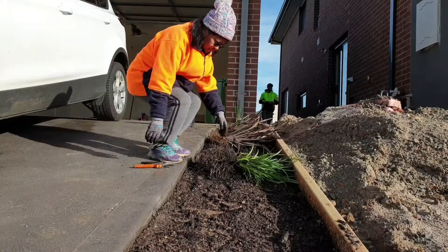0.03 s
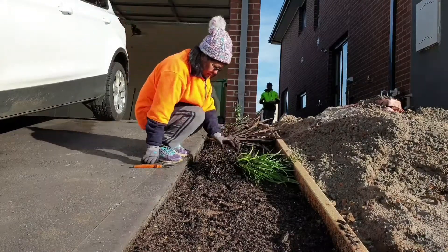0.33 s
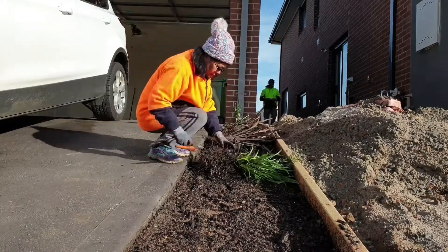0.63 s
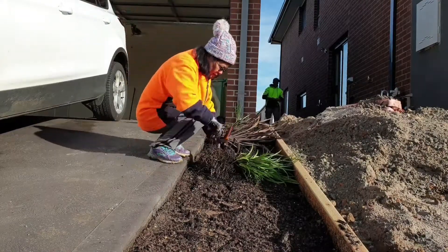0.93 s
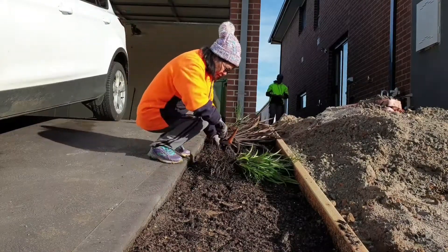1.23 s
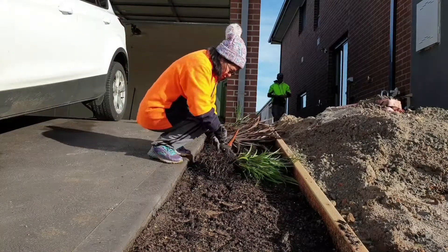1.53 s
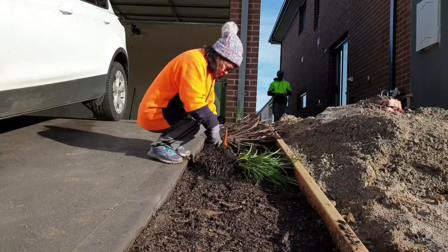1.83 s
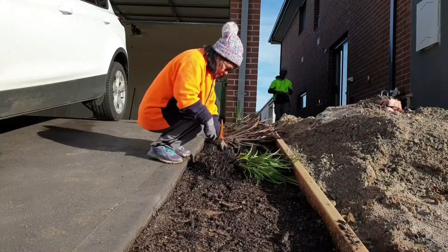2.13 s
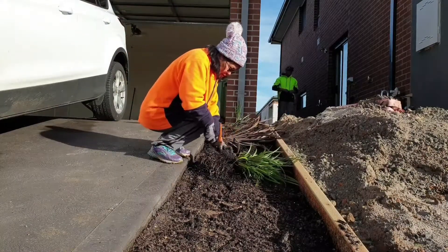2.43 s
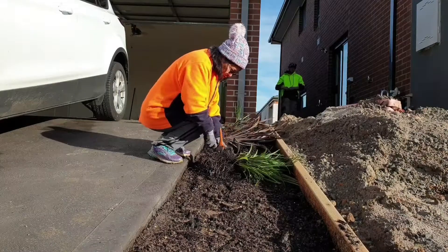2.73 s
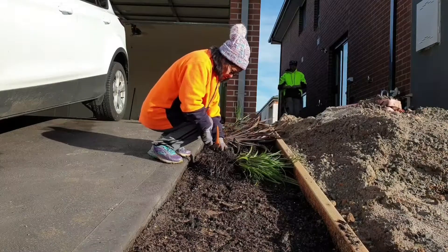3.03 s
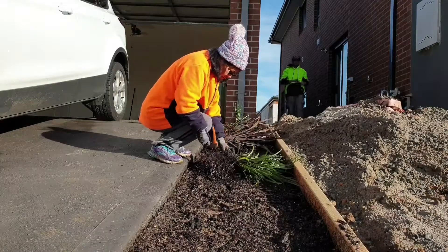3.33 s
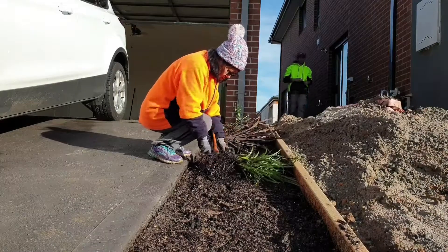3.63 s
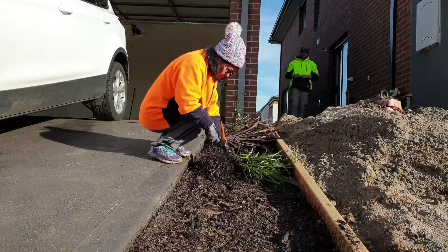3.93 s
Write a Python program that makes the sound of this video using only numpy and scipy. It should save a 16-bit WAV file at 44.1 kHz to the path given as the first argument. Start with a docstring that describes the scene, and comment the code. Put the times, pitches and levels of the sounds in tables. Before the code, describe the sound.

Crunchy digging in soil and mulch with a hand tool, after a brief scrape on concrete.

```python
"""Hand tool in a garden bed

Close by, a gardener drags a hand tool off a concrete driveway and works it four times into soil and
bark mulch. Each stroke is a crunch of tiny grains with twigs snapping in it; leaves and sleeves rustle
in between. The slab and house walls answer briefly at the stereo microphone, over a low rumble of wind
and a distant hum."""
import sys
import numpy as np
from scipy import signal
from scipy.fft import rfft, irfft
from scipy.io import wavfile

SR = 44100
rng = np.random.default_rng(int(sys.argv[2]) if len(sys.argv) > 2 else 0)


def store_pcm(level_fs):
    """Save levels as 16-bit WAV."""
    pcm = np.round(np.clip(level_fs, -1, 1) * 32767).astype(np.int16)
    wavfile.write(sys.argv[1], SR, np.atleast_2d(pcm).T)


N = 176400
T = np.arange(N) / SR
HZ = np.maximum(np.fft.rfftfreq(N, 1 / SR), 1)


def from_db(db):
    """Decibels to gain."""
    return 10 ** (np.asarray(db) / 20)


def rms_one(x):
    """Scale to unit power."""
    return x / np.sqrt(np.mean(x ** 2) + 1e-20)


def at_hz(points):
    """Read a table on a log-frequency axis."""
    hz, value = np.transpose(points)
    return np.interp(np.log(HZ), np.log(hz), value)


def colour(x, spectrum, tilt_db=0):
    """Give a texture its spectrum, tilted per octave and falling below the first point; unit power."""
    low_hz = spectrum[0][0]
    gain = from_db(at_hz(spectrum) + tilt_db * np.log2(np.maximum(HZ, low_hz)))
    bass_cut = np.minimum(HZ / low_hz, 1) ** 2
    return rms_one(irfft(rfft(x) * gain * bass_cut, N))


def stereo(pair, likeness):
    """Two unrelated signals become left and right, with likeness as their correlation."""
    mid = np.sqrt(1 + likeness) * pair[0]
    side = np.sqrt(1 - likeness) * pair[1]
    return np.array([mid + side, mid - side]) / np.sqrt(2)


def noise(likeness, size=N):
    """White stereo noise with a given left-right correlation."""
    return stereo(rng.standard_normal((2, size)), likeness)


def drift(hz):
    """Random wander of unit power, mostly slower than hz."""
    return rms_one(irfft(rfft(rng.standard_normal(N)) / (1 + (HZ / hz) ** 2), N))


def swell(time, rise, hold, fall, db):
    """Reach db at the given time, hold and fall; rise and fall are the seconds taken for 20 dB."""
    before = np.maximum(time - T, 0) / rise
    after = np.maximum(T - time - hold, 0) / fall
    return from_db(db - 20 * (before + after))


def resonate(x, hz, t60):
    """A resonance with gain 1 at its top, dying by 60 dB in t60 seconds."""
    r = from_db(-60 / (t60 * SR))
    feedback = [1, -2 * r * np.cos(2 * np.pi * hz / SR), r * r]
    return signal.lfilter(np.array([1, 0, -1]) * (1 - r * r) / 2, feedback, x + 1e-18)


def band_around(hz, octaves):
    """A gentle band-pass reaching so many octaves to each side, capped in the high treble."""
    edges = [hz / 2 ** octaves, min(hz * 2 ** octaves, SR / np.e)]
    return signal.butter(1, edges, "band", fs=SR, output="sos")


def grains(per_s, spread_db, likeness):
    """Random tiny contacts, many small and a few large."""
    sizes = from_db(spread_db * np.minimum(rng.exponential(1, (2, N)), 5))
    signs = rng.choice([-1, 1], (2, N))
    struck = rng.random((2, N)) < per_s / SR
    return stereo(sizes * signs * struck, likeness)


def outdoors():
    """Low wind with a rumble that swells twice, and a faint far hiss."""
    # wind, rumble and far hiss spectra: (frequency [Hz], level [dB])
    wind_spectrum = [(20, -24), (30, -14), (38, -10.5), (47, 2), (60, -4), (85, -7), (130, -10.5),
                     (170, -10.5), (230, -18), (300, -20.5), (430, -23), (520, -29), (700, -34),
                     (1200, -44.5), (2500, -60.5)]
    rumble_spectrum = [(90, -4.5), (150, -3), (250, -6), (400, -33), (1000, -63), (3000, -70)]
    hiss_spectrum = [(700, 4), (1100, -7.5), (2000, -8), (4000, -10), (5500, -16.5), (7200, -12),
                     (9000, -28), (11000, -8), (14500, -9)]
    # wind across the microphone pair: (frequency [Hz], left-right correlation [0-1])
    wind_likeness = [(30, 0.9), (120, 0.9), (250, 0.85), (500, 0.3), (1000, 0.015)]
    # rumble swells: (peak time [s], rise [s], hold [s], fall [s], level [dB])
    swells = [(0.45, 0.068, 0.032, 0.072, -58.5), (2.29, 0.34, 0.23, 0.4, -56)]
    airflow = irfft(stereo(rfft(rng.standard_normal((2, N))), at_hz(wind_likeness)), N)
    wind = colour(airflow, wind_spectrum) * from_db(-50 + drift(hz=4.1))
    rumble = colour(noise(likeness=0.94), rumble_spectrum) * sum(swell(*row) for row in swells)
    hiss = colour(noise(likeness=0.062), hiss_spectrum) * from_db(-75)
    return wind + rumble + hiss


def distant_hum(low_hz=360.5, high_hz=442.3, waver_hz=2.96):
    """Two wavering tones from far away; the lower is husky and swells near the end."""
    # course of the lower tone: (time [s], level [dB])
    levels = [(0, -73), (0.9, -72), (1.3, -67), (1.9, -74), (2.7, -80), (3.05, -70.5), (3.19, -60),
              (3.35, -58), (3.58, -65), (3.7, -75), (3.82, -65), (4, -62)]
    pitches = [hz + waver_hz * drift(hz=17.5) for hz in (low_hz, high_hz)]
    low, high = [np.sqrt(2) * np.sin(2 * np.pi * np.cumsum(hz) / SR) for hz in pitches]
    low_db = np.interp(T, *np.transpose(levels)) + 0.5 * drift(hz=43)
    husk = from_db(-7) * rms_one(resonate(noise(likeness=0.55), low_hz, t60=0.055))
    high_db = -78.5 + 2 * drift(hz=3.9)
    return (low + husk) * from_db(low_db) + high * from_db(high_db)


def rustling():
    """Leaves and sleeves brush softly between strokes."""
    # rustles: (peak time [s], rise [s], hold [s], fall [s], level [dB], tilt [dB/octave])
    rustles = [(0.0, 0.05, 0.014, 0.14, -73, -8), (0.172, 0.12, 0.032, 0.19, -74.5, -2),
               (0.67, 0.067, 0.11, 0.087, -79.5, -3), (0.976, 0.044, 0.011, 0.081, -71, -6.5),
               (1.074, 0.075, 0.014, 0.065, -72.5, -0.5), (1.673, 0.57, 0.16, 0.1, -68, -2),
               (1.994, 0.15, 0.014, 0.11, -71, -3), (2.418, 0.26, 0.065, 0.087, -71, -1),
               (2.813, 0.15, 0.033, 0.085, -67, 1.5), (2.917, 0.08, 0.07, 0.21, -72, 0.5),
               (3.334, 0.072, 0.023, 0.13, -65.5, 4.5), (3.69, 0.26, 0.081, 0.12, -69.5, -1)]
    # brushing leaves: (frequency [Hz], level [dB])
    leaves = [(600, -37), (1500, -12.5), (2000, -11.5), (2450, -8.5), (2800, -10.5), (3200, -10),
              (4000, -13), (5700, -9.5), (6600, -2), (8200, -5), (9300, -13), (11000, -16.5),
              (14000, -15.5)]
    fibres = grains(per_s=8300, spread_db=3, likeness=0.17)
    return sum(colour(fibres, leaves, tilt) * swell(*shape) for *shape, tilt in rustles)


def tool_on_concrete():
    """Grit rasps under the tool and rings its blade; as it lifts it knocks and its handle clacks."""
    # the slide and the blade's singing: (peak time [s], rise [s], hold [s], fall [s], level [dB])
    slide = [(0.365, 0.08, 0.054, 0.16, -51.5)]
    singing = [(0.286, 0.028, 0.042, 0.05, -65), (0.334, 0.063, 0.073, 0.073, -56)]
    # rasp on concrete: (frequency [Hz], level [dB])
    rasp_spectrum = [(250, -10), (400, -3), (490, 4.5), (700, -7.5), (1200, -9), (2000, -11.5),
                     (4000, -9.5), (7000, -11), (9000, -16.5), (14000, -20)]
    # blade and handle modes: (frequency [Hz], relative level [dB], t60 [s])
    blade_modes = [(476, 1, 0.1), (592, -4.5, 0.11), (1233, -6, 0.076), (3130, -15, 0.053),
                   (4470, -23, 0.03), (5020, 2, 0.018), (5420, -1, 0.027), (6240, -9, 0.018),
                   (6500, -12, 0.022), (6970, -18, 0.04)]
    handle_modes = [(854, 2, 0.0061), (1110, -3, 0.0093), (1626, -13, 0.013), (2310, -18, 0.014),
                    (3260, -4, 0.031), (3740, -16, 0.035), (6940, -3, 0.018)]
    # knocks on the slab: (time [s], level [dB], centre [Hz], length [s])
    hits = [(0.3425, -48, 5000, 0.004), (0.3700, -42.5, 4340, 0.0036), (0.4292, -56, 8050, 0.0014),
            (0.4555, -43, 4430, 0.0072), (0.5015, -47.5, 3230, 0.015)]
    grit = grains(per_s=4900, spread_db=1.5, likeness=0.085)
    rasp = colour(grit, rasp_spectrum) * swell(*slide[0])
    ringing = sum(from_db(db) * rms_one(resonate(grit, hz, t60)) for hz, db, t60 in blade_modes)
    blade = rms_one(ringing) * sum(swell(*row) for row in singing)
    knocks = contacts(hits, octaves=1.86, ring_db=-7)
    handle = sum(from_db(10.5 + db) * resonate(knocks, hz, t60) for hz, db, t60 in handle_modes)
    return rasp + blade + knocks + handle


def contacts(rows, octaves, ring_db):
    """Each contact builds up, cracks (20 dB down over its length), spatters and rings at its centre."""
    build_up_s, splinter_s, ring_cycles = 0.008, 0.018, 7.3
    size, lead = 3072, 512  # samples in a burst, and ahead of its crack
    t = (np.arange(size) - lead) / SR
    spatter = from_db(np.where(t < 0, -14 + 20 * t / build_up_s, -16.5 - 20 * t / splinter_s))
    out = np.zeros((2, N + SR))
    for time, db, hz, length in rows:
        crack = noise(likeness=0.2, size=size) * from_db(-20 * abs(t) / length) * (t >= 0)
        splinters = rms_one(rng.standard_normal((2, size)) ** 3) * spatter
        bass_cut = signal.butter(2, hz / 2 ** octaves, "high", fs=SR, output="sos")
        burst = signal.sosfilt(np.vstack([bass_cut, band_around(hz, octaves)]), crack + splinters)
        ring = from_db(ring_db) * resonate(burst, hz, t60=ring_cycles / hz)
        decay_rms = np.sqrt(length * SR / size / np.log(100))  # longer cracks carry more energy
        start = int(time * SR) - lead
        out[:, start:start + size] += from_db(db) * decay_rms * rms_one(burst + ring)
    return out[:, :N]


def digging():
    """Crumbs of soil crunch under each stroke while twigs and bark snap."""
    # pushes through soil: (peak time [s], rise [s], hold [s], fall [s], level [dB], tilt [dB/octave])
    digs = [(1.366, 0.092, 0.016, 0.18, -68.5, 0.5), (1.538, 0.068, 0.018, 0.11, -56, 0.5),
            (1.641, 0.051, 0.01, 0.11, -66, -3.5), (1.737, 0.023, 0.045, 0.17, -61, -6),
            (1.802, 0.037, 0.022, 0.093, -61, 4), (2.541, 0.02, 0.0034, 0.016, -48.5, 8.5),
            (2.534, 0.022, 0.08, 0.088, -57, 1.5), (3.109, 0.11, 0.016, 0.075, -54.5, 0),
            (3.147, 0.033, 0.021, 0.074, -53.5, -1.5), (3.519, 0.071, 0.032, 0.087, -54, -0.5),
            (3.745, 0.042, 0.0054, 0.041, -70, 5)]
    # crunching soil: (frequency [Hz], level [dB])
    soil = [(250, 1), (500, 3), (850, -0.5), (1250, -6), (1700, -6), (2100, -12), (2550, -4.5),
            (4200, -4.5), (6500, -1), (9000, -5), (14000, -5)]
    # breaking twigs and bark: (time [s], level [dB], centre [Hz], length [s])
    snaps = [(1.3585, -55, 7000, 0.0037), (1.379, -57, 7500, 0.0067), (1.478, -57.5, 7600, 0.004),
             (1.504, -47, 7260, 0.0049), (1.5225, -44, 8400, 0.002), (1.5495, -40.5, 5800, 0.0029),
             (1.5645, -37.5, 4170, 0.0013), (1.568, -48, 2700, 0.006), (1.580, -52, 2200, 0.005),
             (1.6035, -43.5, 2430, 0.003), (1.607, -53, 1920, 0.011), (1.613, -45, 5100, 0.0038),
             (1.7905, -49, 7450, 0.0016), (1.875, -58, 7000, 0.0015), (2.446, -52.5, 7000, 0.0066),
             (2.469, -55, 7400, 0.0055), (2.4985, -51, 7300, 0.0053), (2.5175, -42.5, 7540, 0.0033),
             (2.534, -43, 9000, 0.0015), (2.5395, -39, 6300, 0.0027), (2.545, -40.5, 8500, 0.0075),
             (2.560, -37.5, 6150, 0.0016), (2.576, -51.5, 3270, 0.0091), (2.594, -52, 4000, 0.013),
             (2.611, -40.5, 5900, 0.0016), (3.051, -49, 6970, 0.0032), (3.0555, -52, 7100, 0.0077),
             (3.0675, -40.5, 7500, 0.0035), (3.085, -40, 5700, 0.0021), (3.088, -48, 6500, 0.0018),
             (3.0975, -39, 6300, 0.0062), (3.1024, -32.5, 5440, 0.0035), (3.131, -45.5, 4470, 0.0065),
             (3.146, -47, 5600, 0.024), (3.157, -38.5, 6500, 0.0041), (3.1635, -46, 5400, 0.0056),
             (3.172, -38, 4630, 0.0011), (3.197, -47, 6500, 0.0043), (3.476, -57, 7500, 0.012),
             (3.4865, -46, 6600, 0.005), (3.510, -49.5, 7900, 0.017), (3.538, -41.5, 5400, 0.0043),
             (3.548, -52, 4750, 0.009), (3.747, -55, 8100, 0.008), (3.755, -55, 7700, 0.0087)]
    crumbs = crumble()
    crunch = sum(colour(crumbs, soil, tilt) * swell(*shape) for *shape, tilt in digs)
    return crunch + contacts(snaps, octaves=0.78, ring_db=7.5)


def crumble(grains_per_s=5000):
    """Soil gives way in broad cracks and in crumbs that each tick at a pitch of their own."""
    ticks = grains(grains_per_s, spread_db=3, likeness=0.49)
    pitches_hz = np.geomspace(1100, 11800, 18)
    pitch_index = rng.integers(0, len(pitches_hz), N)
    crumbs = sum(signal.sosfilt(band_around(hz, octaves=0.31), ticks * (pitch_index == k) + 1e-18)
                 for k, hz in enumerate(pitches_hz))
    cracks = grains(grains_per_s, spread_db=2, likeness=0.098)
    return rms_one(cracks) + from_db(-1.5) * rms_one(crumbs)


def driveway_bounce(x, delays_s=(0.001238, 0.001557)):
    """One close reflection off the slab reaches the left microphone port, then the right."""
    delayed = [np.pad(side, (int(lag * SR), 0))[:N] for side, lag in zip(x, delays_s)]
    return from_db(-21) * np.array(delayed)


def walls(x, t60=0.14, delay_s=0.0043, cutoff_hz=15600):
    """A short, slightly dull scatter from the house, the car and the ground nearby."""
    t = T[:SR // 2]
    scatter = rng.standard_normal((2, len(t))) * from_db(-60 * t / t60) * (t > delay_s)
    dulled = signal.sosfilt(signal.butter(1, cutoff_hz, fs=SR, output="sos"), scatter)
    response = rms_one(dulled) / np.sqrt(len(t))
    return from_db(-9) * signal.fftconvolve(x, response, axes=1)[:, :N]


def scene():
    """The close work and its reflections over the outdoor background."""
    work = tool_on_concrete() + digging() + rustling()
    return work + driveway_bounce(work) + walls(work) + outdoors() + distant_hum()


def record(dry, cutoff_hz=14500):
    """The two microphone ports colour the sound differently; the top is cut steeply."""
    # balance of the ports: (frequency [Hz], left minus right [dB])
    balance = [(50, -3), (130, -2.1), (300, 0), (1300, 0.5), (2300, -0.2), (4400, -0.5), (7000, 0),
               (8100, -8), (9500, 0), (11000, -0.5), (12800, 0), (14500, 3)]
    half_db = at_hz(balance) / 2
    heard = irfft(rfft(dry) * from_db([half_db, -half_db]), N)
    return signal.sosfilt(signal.ellip(12, .2, 70, cutoff_hz, fs=SR, output="sos"), heard)


dry = scene()
out = record(dry)
store_pcm(out)
```